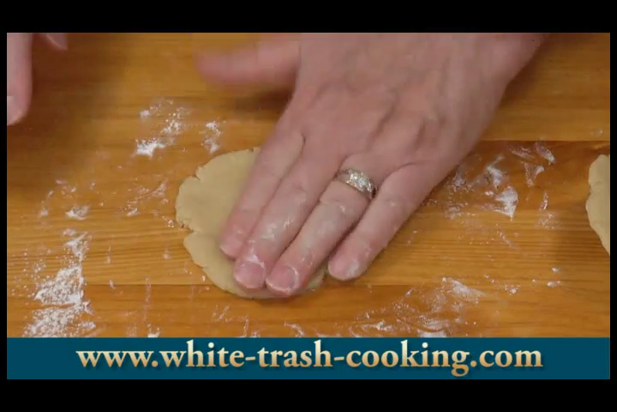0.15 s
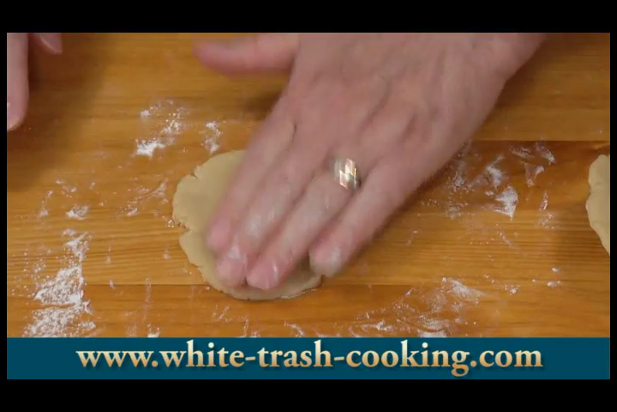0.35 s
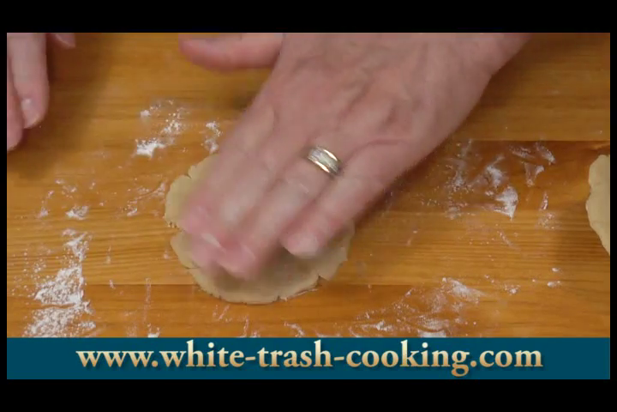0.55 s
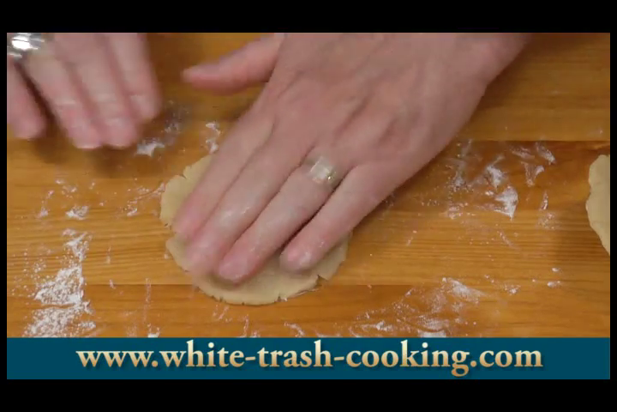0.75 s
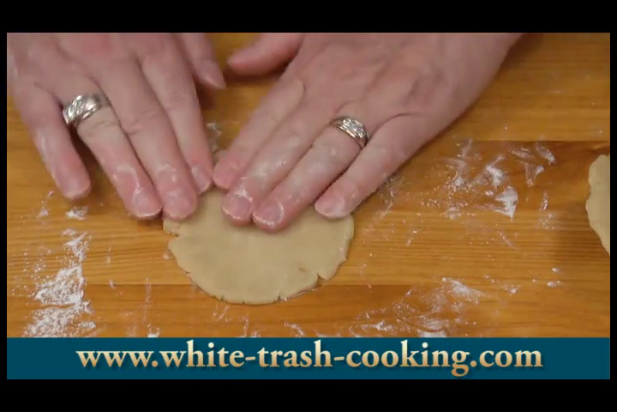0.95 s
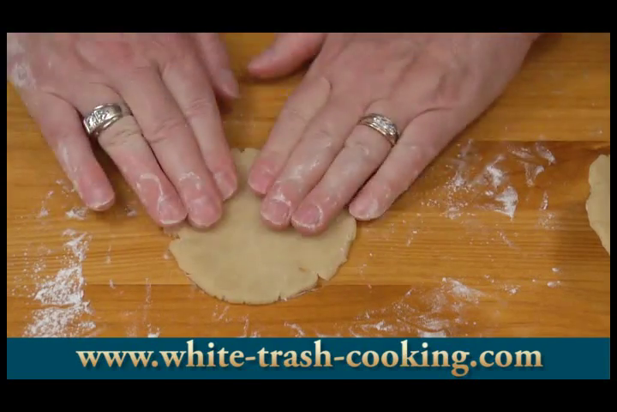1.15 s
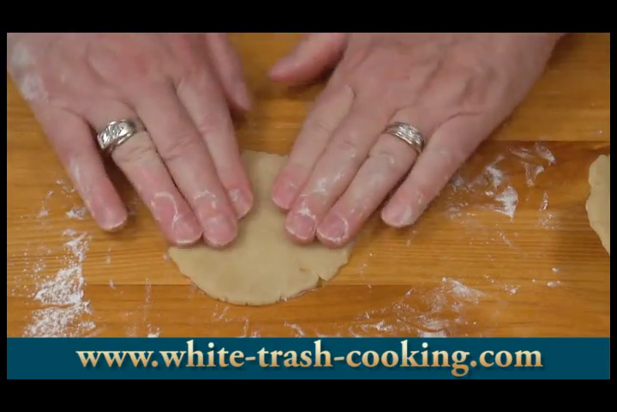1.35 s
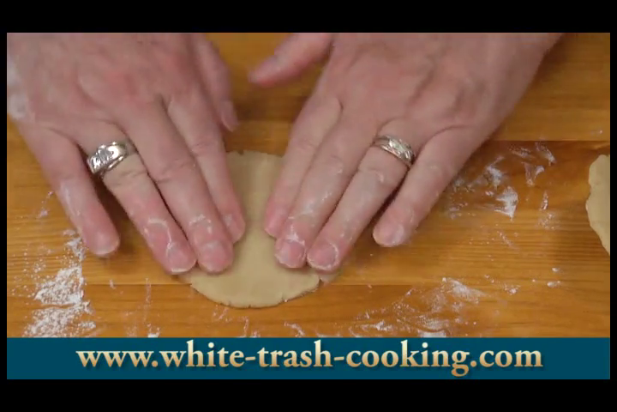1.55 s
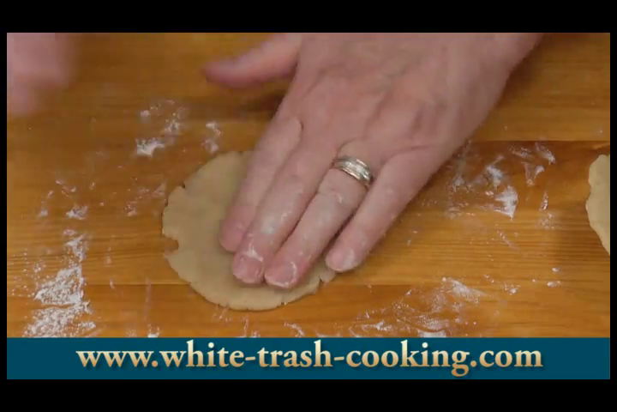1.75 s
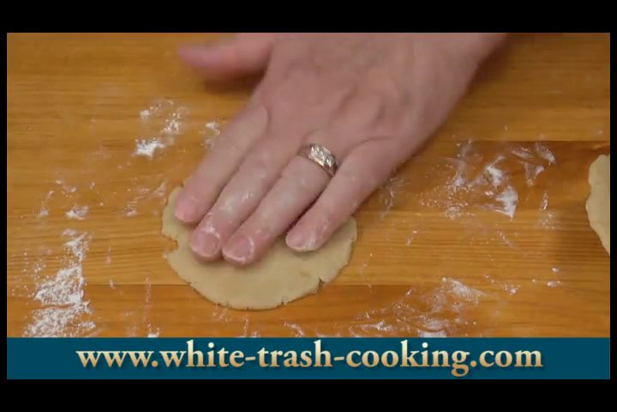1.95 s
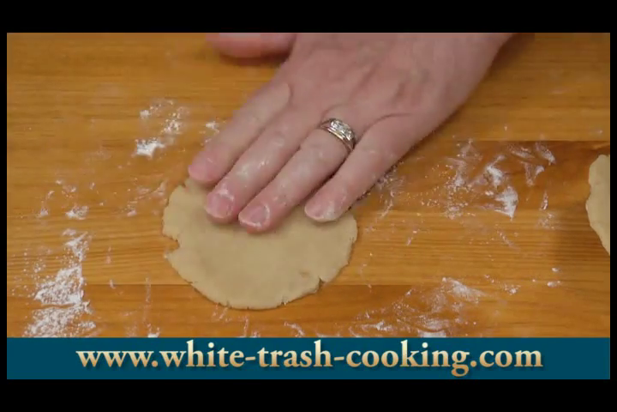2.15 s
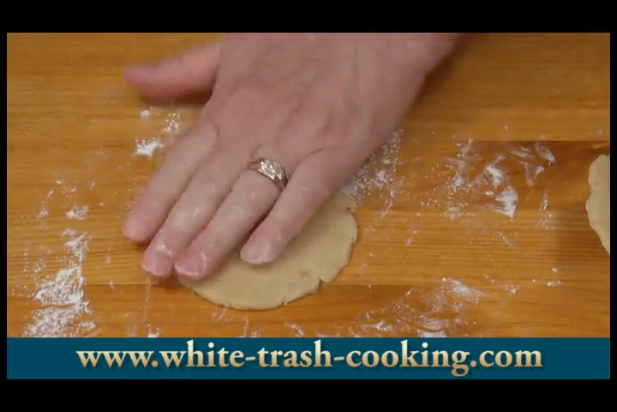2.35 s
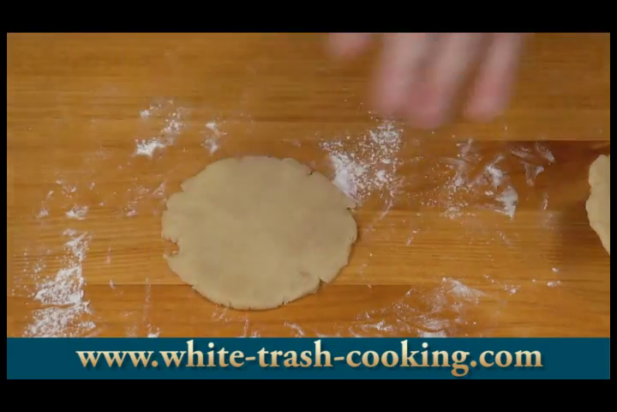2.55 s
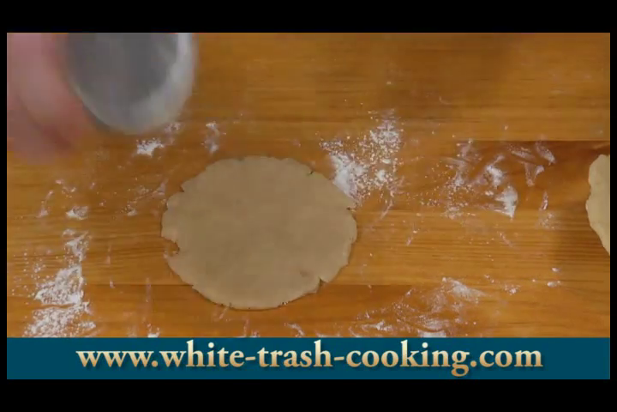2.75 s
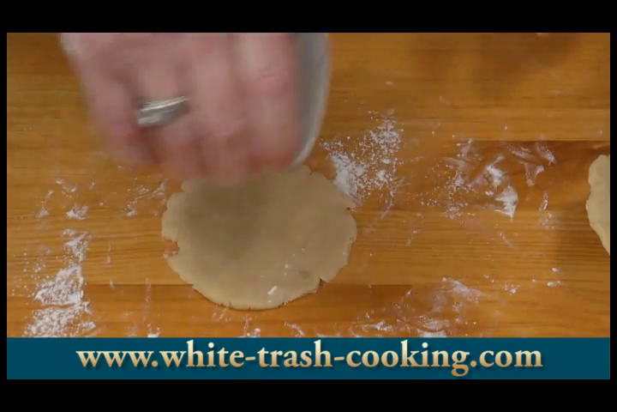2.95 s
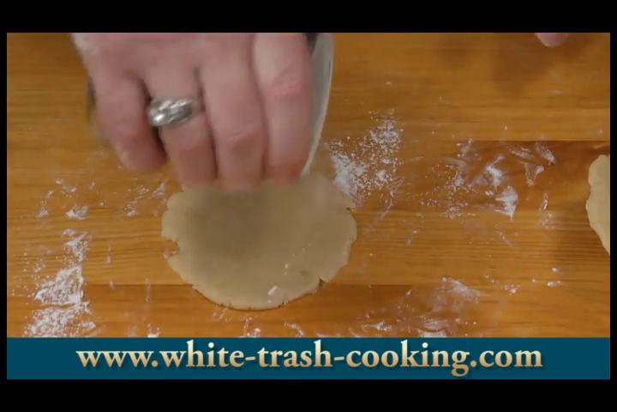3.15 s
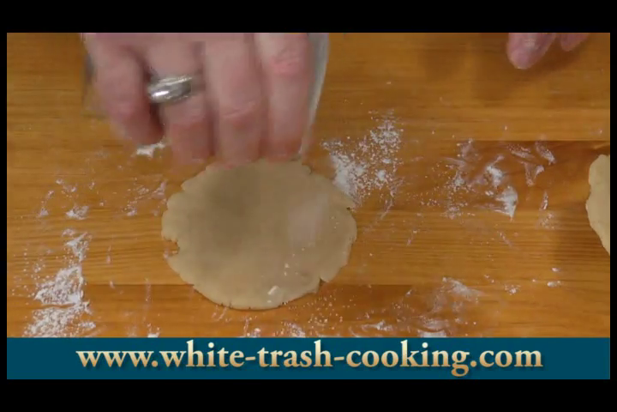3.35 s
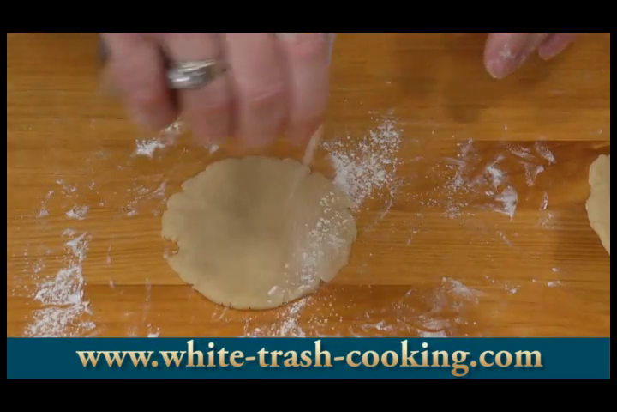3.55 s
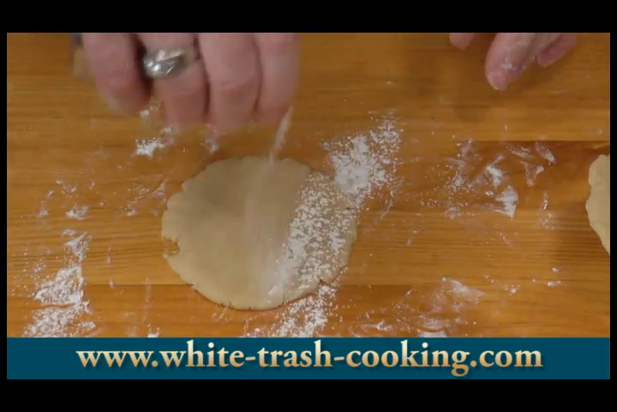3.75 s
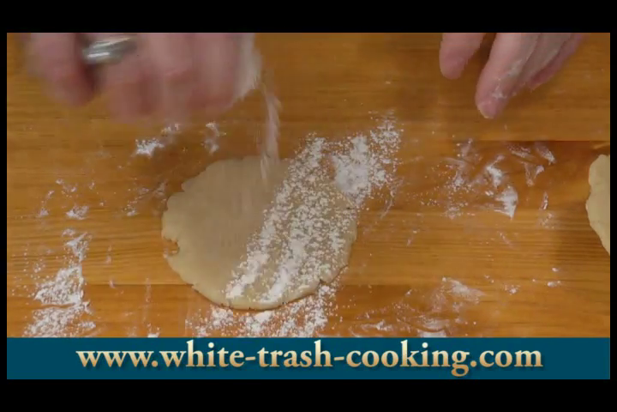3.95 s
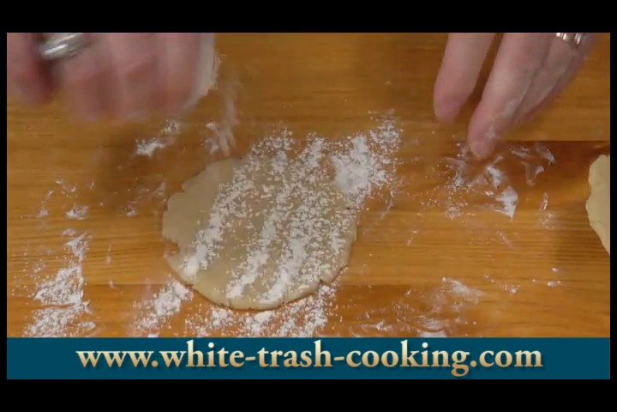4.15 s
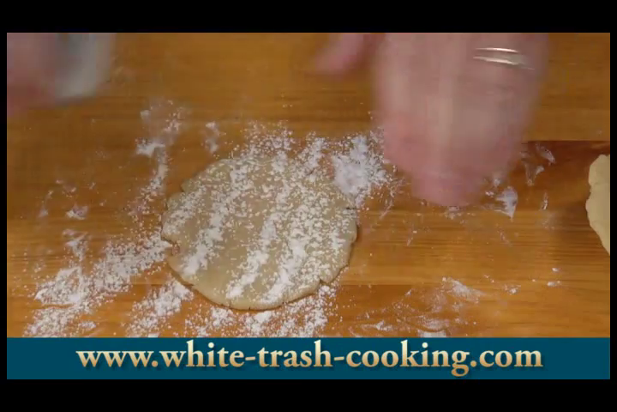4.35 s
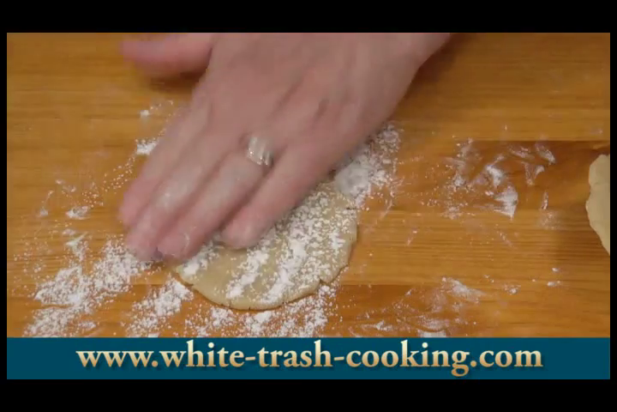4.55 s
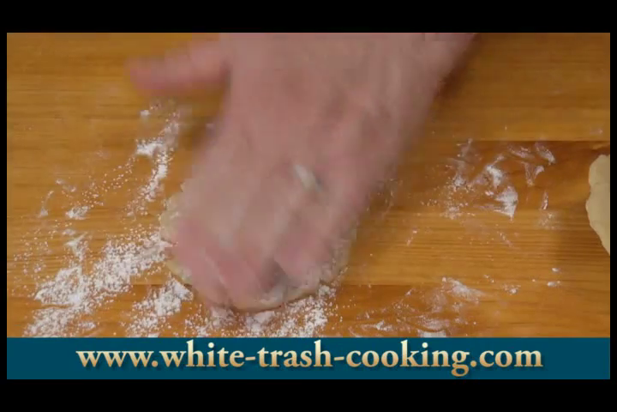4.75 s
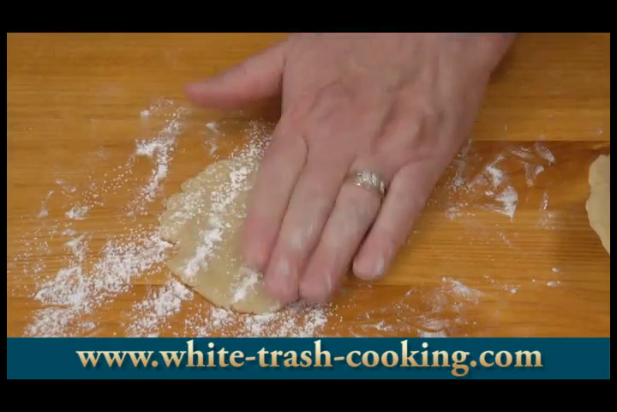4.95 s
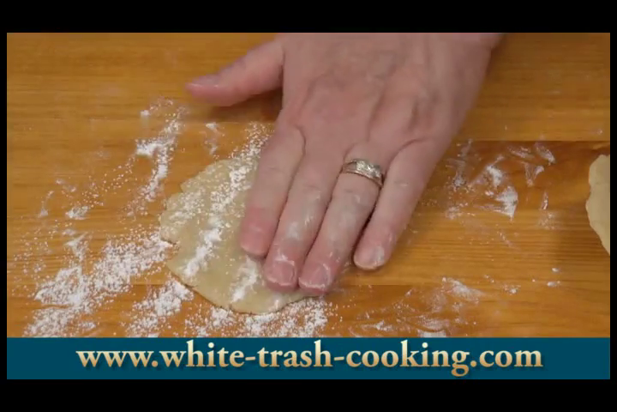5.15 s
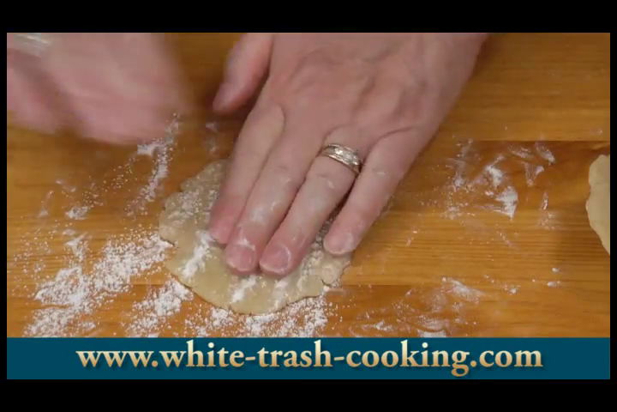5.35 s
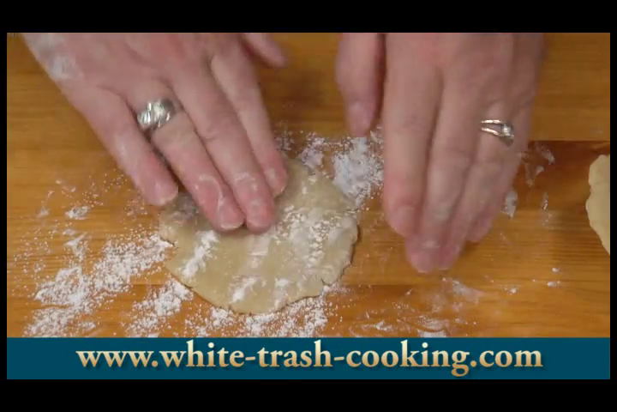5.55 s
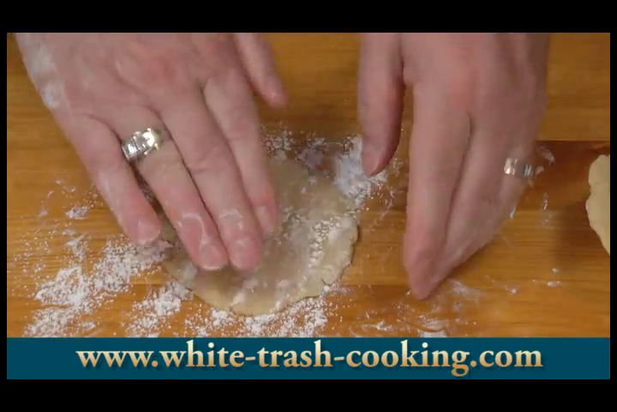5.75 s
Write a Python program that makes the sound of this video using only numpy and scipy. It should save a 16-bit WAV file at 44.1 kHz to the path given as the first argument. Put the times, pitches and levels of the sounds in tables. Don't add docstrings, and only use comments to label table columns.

```python
import sys
import numpy as np
from scipy import signal
from scipy.fft import rfft, irfft, next_fast_len
from scipy.io import wavfile
from scipy.ndimage import map_coordinates

SR = 44100
rng = np.random.default_rng(int(sys.argv[2]) if len(sys.argv) > 2 else 0)


def gain_from_db(level_db):
    decades = np.asarray(level_db, float) / 20
    return 10 ** decades


def generate_wav(signal):
    frames = np.transpose(np.atleast_2d(signal))
    scaled = np.clip(frames, -1, 1) * 32767
    pcm = np.round(scaled).astype(np.int16)
    wavfile.write(sys.argv[1], SR, pcm)


N = 256309


def rms_one(x):
    return x / np.sqrt(np.mean(x ** 2) + 1e-20)


def band(x, low_hz, high_hz):
    edges_hz = [low_hz, min(high_hz, 0.45 * SR)]
    return signal.sosfilt(signal.butter(2, edges_hz, "band", fs=SR, output="sos"), x)


def drift(rate_hz):
    knots = rng.standard_normal(400)
    return map_coordinates(knots, [np.arange(N) / SR * rate_hz % 399], order=3)


def ring(clicks, hz, t60):
    r = gain_from_db(-60 / (t60 * SR))
    w = 2 * np.pi * hz / SR
    return signal.lfilter([0, np.sin(w)], [1, -2 * r * np.cos(w), r * r], clicks + 1e-18)


def train(times, gains):
    out = np.zeros(N)
    at = np.round(np.asarray(times) * SR).astype(int)
    np.add.at(out, np.clip(at, 0, N - 1), gains)
    return out


def soft(x, seconds):
    window = np.hanning(max(int(seconds * SR), 3))
    return np.convolve(x, window / window.sum())[:N]


def dying(times, db, t60):
    return signal.lfilter([1], [1, -gain_from_db(-60 / (t60 * SR))], train(times, gain_from_db(db)) + 1e-18)


def grains(per_s, spread_db):
    sizes = gain_from_db(spread_db * np.minimum(rng.exponential(1, N), 4))
    signed = sizes * rng.choice([-1, 1], N)
    return rms_one(signed * (rng.random(N) < per_s / SR))


def strike(modes, hit_s, hit_db, chatter, spread_db, cap_s):
    chance = rng.standard_normal((len(hit_s), len(modes), 2))
    skid = gain_from_db(-60 / (0.015 * SR))
    out = 0
    for k, (hz, db, t60) in enumerate(modes):
        sign = np.sign(chance[:, k, 1])
        click = train(hit_s, gain_from_db(hit_db + spread_db * chance[:, k, 0]) * sign)
        skidding = soft(signal.lfilter([0.12], [1, -skid], click + 1e-18), 0.0028)
        rubbing = (skidding + chatter) * rng.standard_normal(N)
        out = out + gain_from_db(db) * ring(0.66 * click + rubbing, hz, min(t60, cap_s))
    return out


# f/Hz, density/dB per Hz
ROOM_AIR = [(12, -58), (20, -13.5), (68, 3.5), (91, -12), (123, -6.5), (204, -9), (234, -6.5), (262, -14.5),
            (388, -12.5), (422, -11.5), (499, -19.5), (849, -18), (2600, -36.5), (14700, -41.5),
            (16000, -39)]
# f/Hz, level/dB
APPLIANCE_WHINES = [(2046, -83), (6735, -103), (8393, -100)]
# t/s of loudest, level/dB, half length/s
APPLIANCE_SQUEAK = [
    (0.12, -92, .09),
    (0.65, -94, .15),
    (2.92, -90, .2),
    (3.4, -96, .1),
    (3.7, -99, .08),
    (4.02, -97, .08),
    (4.15, -98, .05),
    (4.4, -101, .15),
    (5.12, -89, .06),
]


def room_tone():
    hz, db = np.transpose(ROOM_AIR)
    size = next_fast_len(N)
    bin_hz = np.arange(size // 2 + 1) * SR / size
    shape = gain_from_db(np.interp(np.log(bin_hz + 1), np.log(hz), db))
    air = gain_from_db(-58.5) * rms_one(irfft(rfft(rng.standard_normal(size)) * shape, size)[:N])

    pat_s, _, thump_db = np.transpose(PATS)[:3]
    rest_db, kick_db, sway_t60_s = -69, -21, 1.66
    swing = gain_from_db(rest_db) + soft(dying(pat_s, thump_db + kick_db, sway_t60_s), 0.023)
    sway = swing * gain_from_db(2.0 * drift(7)) * rms_one(band(rng.standard_normal(N), 33.7, 98))

    t = np.arange(N) / SR
    whine = sum(gain_from_db(w_db - 6.5 + 2.1 * drift(6.8)) * np.sin(2 * np.pi * w_hz * t)
                for w_hz, w_db in APPLIANCE_WHINES)
    squeak_hz = 6760
    swell = sum(gain_from_db(s_db - 11.0 - 7.9 * ((t - at) / half_s) ** 2) for at, s_db, half_s in APPLIANCE_SQUEAK)
    squeak = swell * np.sin(2 * np.pi * squeak_hz * t + 2.1 * drift(60))
    return air + sway + whine + squeak


# t/s, peak level/dB, chatter after/dB re peak, wooden knock/dB re peak
LANDINGS = [(0.004, -57.5, -9.5, -6), (0.2353, -47, -15.5, -10.5), (0.682, -59.5, -4, -7),
            (0.9608, -46, -8.5, -8), (1.0544, -51.5, -24, -5), (1.1919, -50.5, -16, -3.5),
            (1.2194, -45.5, -10, -19), (1.3809, -43, -12.5, -12.5), (1.5712, -59, -3, -6),
            (1.6103, -53, -12, -11), (1.7818, -48, -3.5, -16.5), (2.0314, -36.5, -12, -14),
            (2.0596, -58, -30, 0), (2.11, -57.5, -2, -18), (2.209, -49.5, -3.5, -18),
            (2.2347, -50.5, -6.5, -10.5), (2.4194, -44, -7.5, -13.5), (2.4495, -32.5, -15.5, -17),
            (2.4684, -44, -35, -26), (4.638, -50, -12, -6), (4.6587, -40, -7, -15),
            (4.6923, -35.5, -17.5, -27), (4.715, -40.5, -41, -26), (4.8668, -46.5, -6, -12),
            (4.899, -45, -4.5, -7.5), (4.9435, -45.5, -13.5, -18), (5.3504, -48, -10.5, -10),
            (5.3888, -55.5, -20, -6), (5.5745, -47.5, -10.5, -10), (5.736, -48, -14.5, -5)]
# t/s, peak level/dB
SMALL_BOUNCES = [(0.704, -61), (0.788, -63), (1.031, -54.5), (1.174, -57), (1.3992, -52.5), (1.656, -68),
                 (1.81, -61.5), (1.846, -68), (2.128, -69), (2.281, -54), (2.323, -58), (2.5328, -55),
                 (4.6733, -46), (4.759, -73), (4.984, -56), (5.335, -61), (5.414, -59), (5.557, -56),
                 (5.642, -63), (5.665, -59), (5.798, -55)]
# t/s, peak level/dB
HARD_JOLTS = [
    (2.032, -60.5),
    (2.0594, -70),
    (2.0774, -79),
    (2.4214, -67),
    (2.4531, -60),
    (2.4744, -69),
    (4.668, -67),
    (4.6944, -75),
    (4.7167, -70),
    (4.7344, -76),
]
# f/Hz, level/dB, t60/s
TIN_LOW_MODES = [(1706, 2, 0.012), (1750, -7, 0.17), (2025, -1, 0.015), (2326, -12.5, 0.069),
                 (2520, -1.5, 0.019), (2758, -3, 0.031)]
# f/Hz, level/dB, t60/s
TIN_MODES = [(3440, -3.5, 0.021), (3840, -22, 0.06), (3920, -8.5, .08), (3990, -11, 0.08),
             (4063, -0.5, 0.072), (4690, -2.5, 0.053), (4620, -14, 0.051), (4660, 1.5, 0.042),
             (4890, -1, 0.032), (5050, -13, 0.076), (5610, -24, 0.12), (4340, -16, 0.043),
             (8250, -1, 0.052), (8930, -13, 0.081), (8540, -4.5, 0.028)]
# f/Hz, level/dB, t60/s
BRIGHT_MODES = [(7235, -4.5, 0.061), (7700, -23, .1), (5630, -18, 0.045), (5740, -10, 0.073),
                (5860, -33, 0.089)]
# f/Hz, level/dB, t60/s
RINGING_MODES = [(11150, 0, .06), (12600, -14, .05)]
# f/Hz, level/dB, t60/s
WOOD_MODES = [(519, -2, 0.047), (697, 0.5, 0.017), (943, -8, 0.032), (1075, -7.5, 0.038),
              (1347, -8.5, 0.023)]


def tools():
    bounces = [(s, db, -11, -9.5) for s, db in SMALL_BOUNCES]
    hit_s, clink_db, chatter_db, knock_db = np.transpose(LANDINGS + bounces)
    jolt_s, jolt_db = np.transpose(HARD_JOLTS)
    level_db = clink_db + chatter_db
    over_db = clink_db + 48.5
    touches = grains(550, 4.5)
    uneven_db, metal_cap_s = 2.5, 0.065

    level = soft(dying(hit_s, level_db, 0.17), 0.0087)
    bright_level = dying(hit_s, level_db + (2.26 - 1) * over_db - 23, 0.21)
    knock_level = dying(hit_s, level_db + knock_db + 16, 0.29)

    tin = strike(TIN_MODES, hit_s, clink_db - 16.0, gain_from_db(-36.5) * level * touches, uneven_db, metal_cap_s)
    low_db = -61.5 + 0.56 * over_db
    tin += strike(TIN_LOW_MODES, hit_s, low_db + 2.5, gain_from_db(-27.5) * level * touches, uneven_db, metal_cap_s)
    bright = strike(BRIGHT_MODES, hit_s, clink_db - 22 + 4, gain_from_db(-25) * bright_level * touches, 0.56, 0.2)
    bright += strike(RINGING_MODES, jolt_s, jolt_db + 1.5, 0, 1.5, metal_cap_s)
    wood = strike(WOOD_MODES, hit_s, clink_db + knock_db, gain_from_db(-26) * knock_level * touches, 3.3, 0.12)
    scratch = gain_from_db(-10.5) * level * rms_one(band(grains(2500, 2.5), 890, 6100))
    return tin + bright + wood + scratch


# t/s, skin tick peak/dB, thump/dB, slap/dB, slap f/Hz
PATS = [(0.0375, -77, -66, -63, 252), (0.197, -53, -44, -60.5, 298), (0.413, -48, -44, -52.5, 380),
        (0.6438, -50, -43, -54, 324), (0.9267, -40.5, -36.5, -34.5, 327), (1.1543, -47.5, -48, -49, 320),
        (1.3442, -60, -49, -52, 287), (1.3595, -55, -46, -59, 257), (1.537, -55.5, -53, -58.5, 254),
        (1.55, -54, -54, -62, 260), (1.745, -45, -40, -45, 387), (1.9639, -39, -38, -41, 400),
        (2.1719, -44, -39.5, -42, 597), (2.378, -47.5, -36.5, -46, 317), (4.618, -53, -40, -51.5, 325),
        (4.8268, -51, -39, -58, 292), (4.8843, -31.5, -57, -26, 430), (5.042, -51, -51.5, -57.5, 337),
        (5.315, -49, -39.5, -43.5, 352), (5.536, -56, -39.5, -43.5, 305), (5.6981, -50, -42, -53, 340)]
# f/Hz, level/dB, t60/s
COUNTER_MODES = [(133.1, 0.5, 0.097), (111, -8.5, 0.084), (59.8, -9.5, 0.099), (42.1, -14.5, 0.42),
                 (190, -7.5, 0.04)]


def thump():
    s, _, thump_db, slap_db = np.transpose(PATS)[:4]
    level_db = thump_db - 1.7 * np.maximum(slap_db - thump_db, 0)
    chance = rng.standard_normal((len(s), len(COUNTER_MODES)))
    push = np.zeros(N)
    for k, (hz, db, t60) in enumerate(COUNTER_MODES):
        blow = train(s + 0.0018, gain_from_db(level_db + db + 4.0 + 2.0 * chance[:, k]))
        push += ring(blow, hz, t60)
    dip = train(s - 0.001, -gain_from_db(level_db + 30))
    return soft(push, 0.00083) + soft(dip, 0.0024)


def tick():
    s, tick_db = np.transpose(PATS)[:2]
    shape = signal.lfilter([1], [1, -gain_from_db(-60 / (0.033 * SR))], train(s, gain_from_db(tick_db - 13.0)))
    return soft(shape, 0.0019) * rms_one(band(rng.standard_normal(N), 2400, 13600))


# t/s, peak level/dB, centre f/Hz
DOUGH_SMACKS = [(0.0379, -51.5, 1160), (0.1946, -56.5, 1790), (0.415, -53, 1350), (0.649, -48.5, 1960),
                (0.79, -59.5, 2590), (0.926, -42.5, 1700), (1.152, -49.5, 1750), (1.3443, -57.5, 1790),
                (1.5348, -57.5, 1770), (1.744, -50, 1490), (1.9666, -44.5, 2010), (2.173, -67, 1420),
                (2.377, -47.5, 2300), (2.646, -61.5, 3640), (4.6163, -47, 1800), (4.6252, -49, 1640),
                (4.8264, -51.5, 1400), (4.886, -38.5, 1270), (5.315, -46.5, 1590), (5.5373, -60, 1410),
                (5.7002, -50.5, 1540)]


def smack():
    out = np.zeros(N + SR)
    t = np.arange(SR // 8) / SR
    for s, db, hz in DOUGH_SMACKS:
        noise = rms_one(band(rng.standard_normal(len(t)), hz / 1.62, hz * 1.27))
        envelope = gain_from_db(db - 2 - 60 * t / 0.028) * np.minimum(t / 0.00073, 1)
        at = round(s * SR)
        out[at:at + len(t)] += envelope * noise
    return out[:N]


# f/Hz, level/dB, t60/s
BOARD_MODES = [(179, 3, 0.25), (292.5, 13, 0.09), (325, 6.5, 0.44), (395, -2, 0.44), (425, -18, 0.5),
               (523, 0.5, 0.34), (617, -7, 0.6), (673, 12, 0.065), (690, 12.5, 0.025), (860, -25, 0.39),
               (1000, -10, 0.2), (1124, -3, 0.49), (1180, -25, 0.05), (1357, -45, 0.33)]


def slap():
    out = np.zeros(N + SR)
    t = np.arange(SR // 3) / SR
    for s, _, _, slap_db, hz in PATS:
        swell = t / (0.0013 * max(hz / 430, 1) ** 2.4)
        overtone_hz = min(1.64 * hz, 656)
        overtone_db = -4.5 + 0.3 * (slap_db + 28.5)
        tones = np.sin(2 * np.pi * hz * t) + gain_from_db(overtone_db) * np.sin(2 * np.pi * overtone_hz * t)
        pop = -swell * np.exp(-swell) * tones

        shake = rng.standard_normal((len(BOARD_MODES), len(t))) * t ** 2 * np.exp(-t / 0.0041)
        wood = np.zeros(len(t))
        for (mode_hz, mode_db, t60), push in zip(BOARD_MODES, shake):
            near_db = -11.0 * abs(np.log2(mode_hz / hz))
            wood += gain_from_db(mode_db + near_db) * ring(push, mode_hz, 0.2 * min(t60, 0.3))
        at = round((s + 0.001) * SR)
        out[at:at + len(t)] += gain_from_db(slap_db + 18.5) * pop + gain_from_db(slap_db - 16.5) * rms_one(wood)
    return signal.sosfilt(signal.butter(2, 120, "high", fs=SR, output="sos"), out[:N])


# t/s of loudest, hiss/dB, swell length/s, duller hiss/dB re hiss
PEELS = [(0.135, -77, 0.083, -7), (0.358, -70, 0.041, -6), (0.578, -72, .045, -4), (0.793, -70, .015, -12),
         (1.084, -75, .04, -7), (1.286, -75.5, .03, -14), (1.472, -74, 0.032, -6), (1.64, -77, .03, -8),
         (1.85, -76, .025, -7), (2.724, -78.5, .1, 0), (2.788, -75.5, .06, -4), (5.064, -66.5, 0.034, 2.5),
         (5.453, -71.5, .035, -13)]


def peel():
    t = np.arange(N) / SR
    snaps = grains(9000, 4.0)
    bright = rms_one(band(snaps, 8900, 12600))
    dull = rms_one(band(snaps, 910, 3600))
    out = np.zeros(N)
    for s, db, swell_s, dull_db in PEELS:
        below_db = np.where(t < s, 20 * ((s - t) / swell_s) ** 2, 810 * (t - s))
        out += gain_from_db(db - below_db) * (bright + gain_from_db(dull_db) * dull)
    return out


def kitchen(x):
    t60_s, wall_cut_hz = 0.19, 6400
    t = np.arange(SR // 2) / SR
    noise = rng.standard_normal(len(t))
    dull = signal.sosfilt(signal.butter(1, wall_cut_hz, fs=SR, output="sos"), noise)
    tail = dull * gain_from_db(-60 * t / t60_s) + (noise - dull) * gain_from_db(-60 * t / (0.79 * t60_s))
    tail *= np.clip((t - 0.004) / 0.017, 0, 1)
    return signal.fftconvolve(x, tail / np.sqrt(np.sum(tail ** 2)))[:N]


def scene():
    near = slap() + tick() + smack() + tools() + peel()
    low = thump()
    reflections = gain_from_db(-8.5) * kitchen(near + 0.35 * low)
    return (near + low + reflections + room_tone())[None]


def top_cut(x):
    return signal.sosfilt(signal.butter(12, 16530, fs=SR, output="sos"), x)


def record(dry):
    x = signal.sosfilt(signal.butter(3, 33, "high", fs=SR, output="sos"), dry)
    x = signal.sosfilt(signal.ellip(12, 0.3, 60, 15780, fs=SR, output="sos"), x)
    return top_cut(x)


dry = scene()
out = record(dry)
generate_wav(out)
```